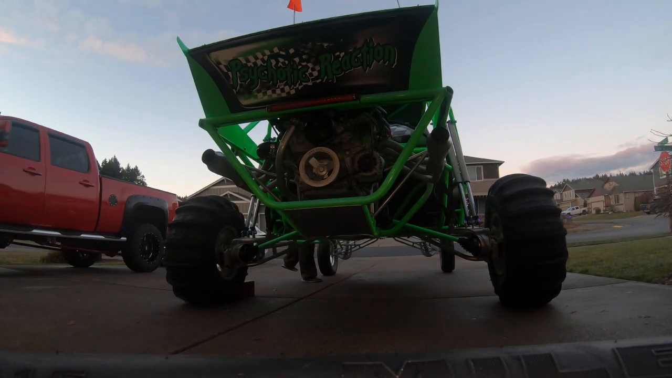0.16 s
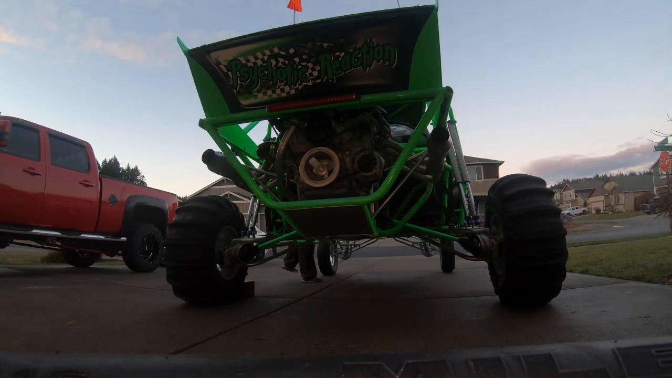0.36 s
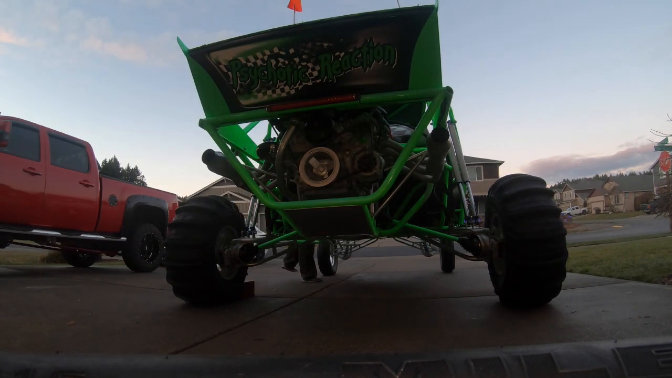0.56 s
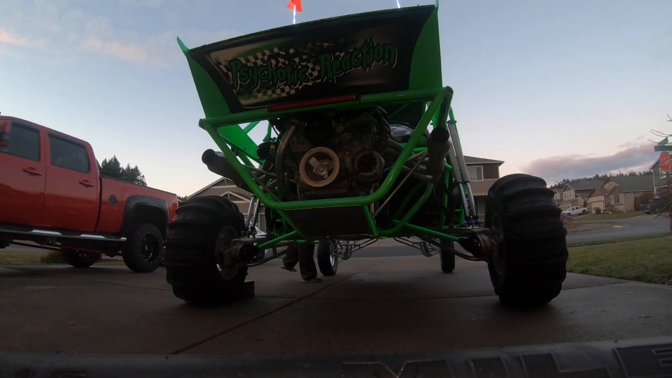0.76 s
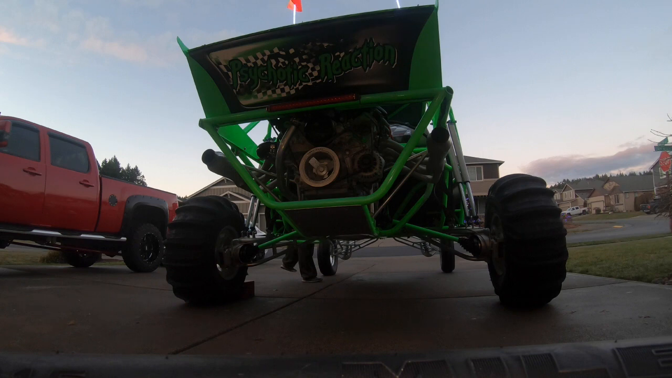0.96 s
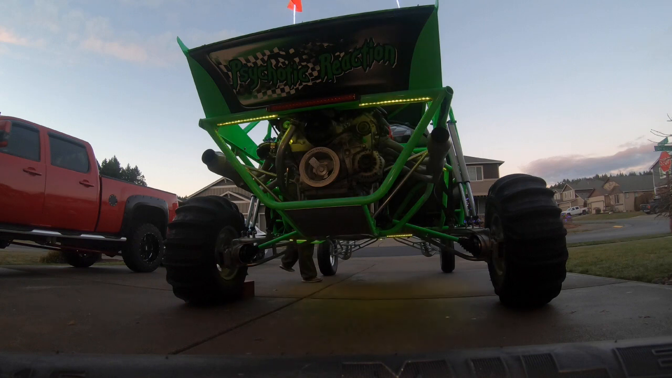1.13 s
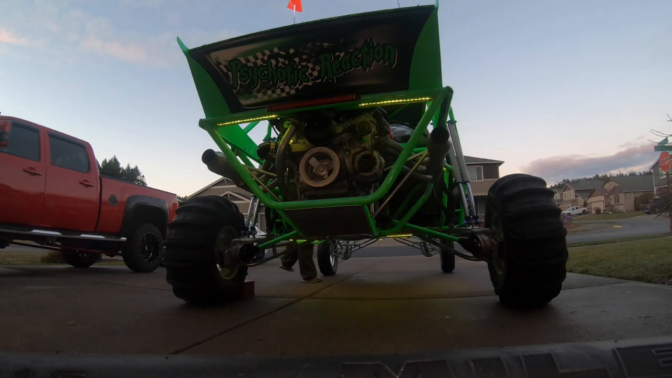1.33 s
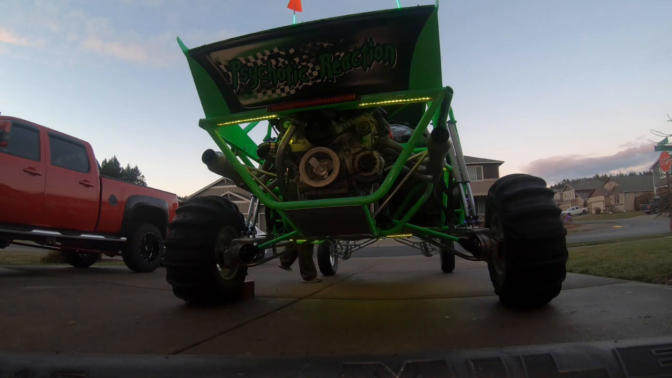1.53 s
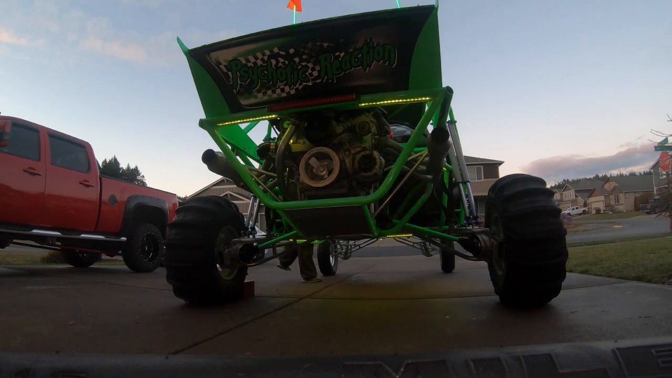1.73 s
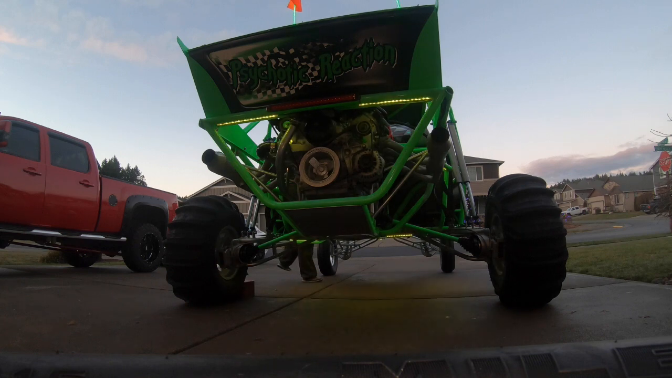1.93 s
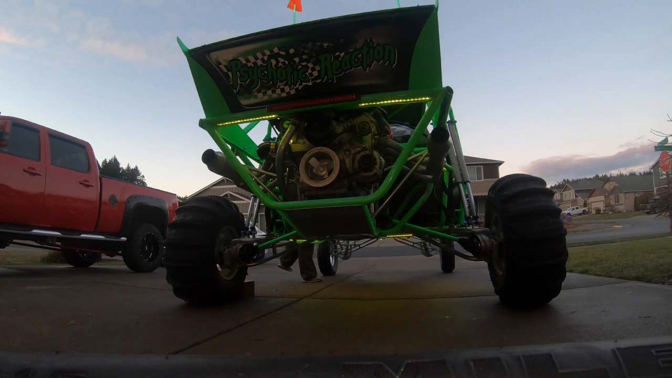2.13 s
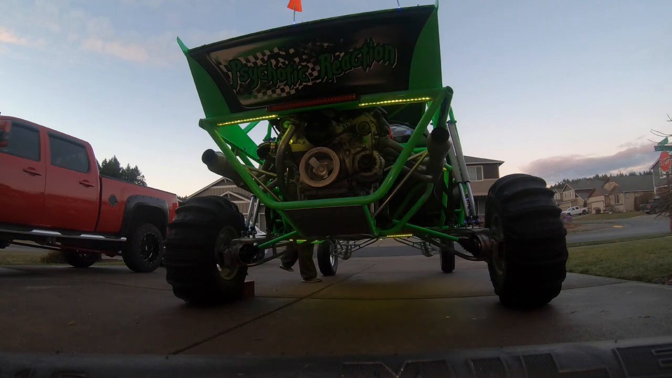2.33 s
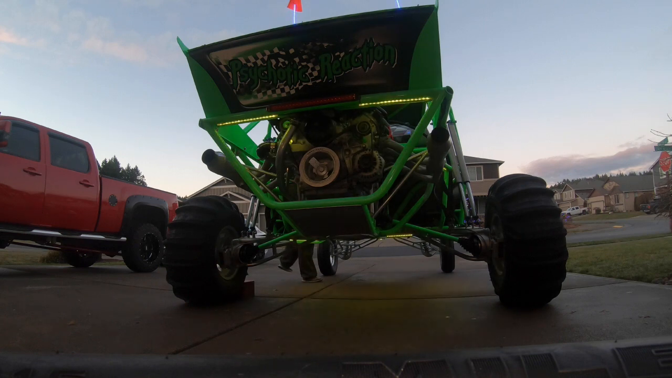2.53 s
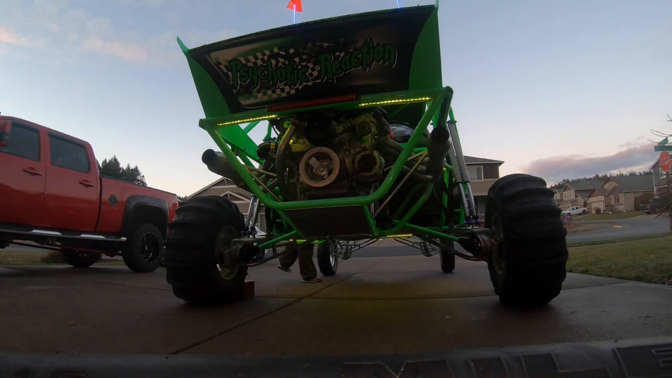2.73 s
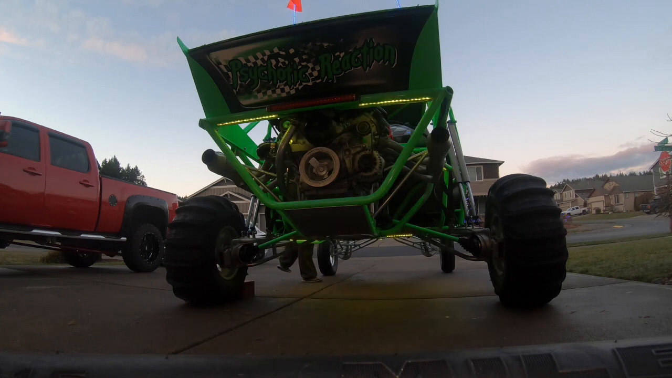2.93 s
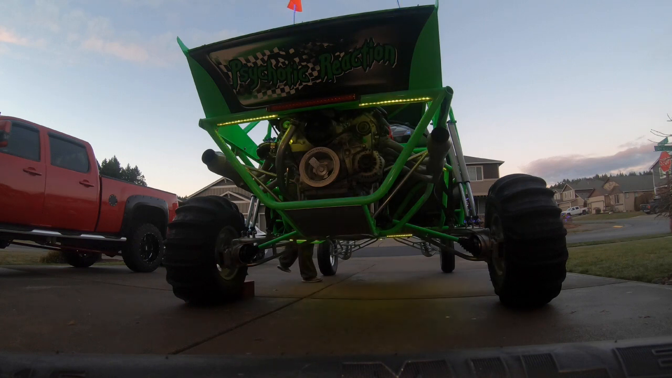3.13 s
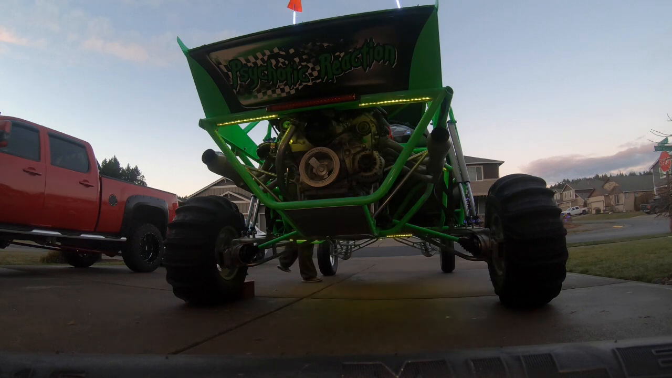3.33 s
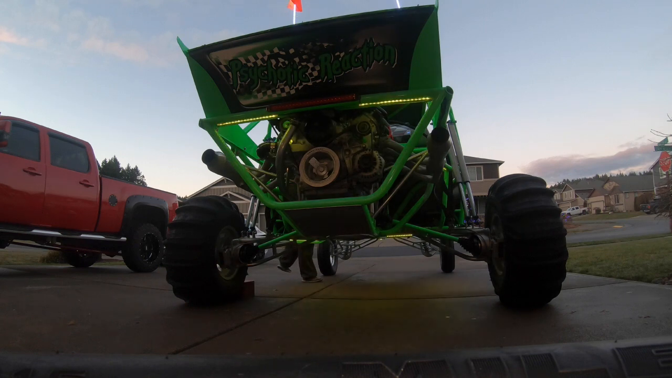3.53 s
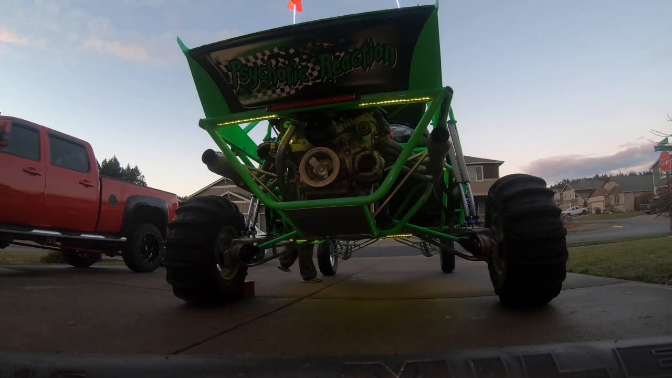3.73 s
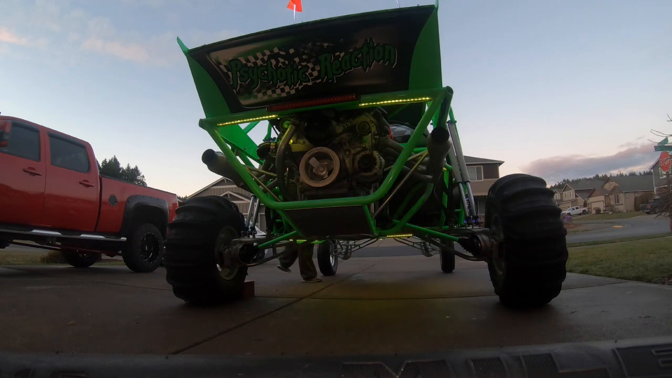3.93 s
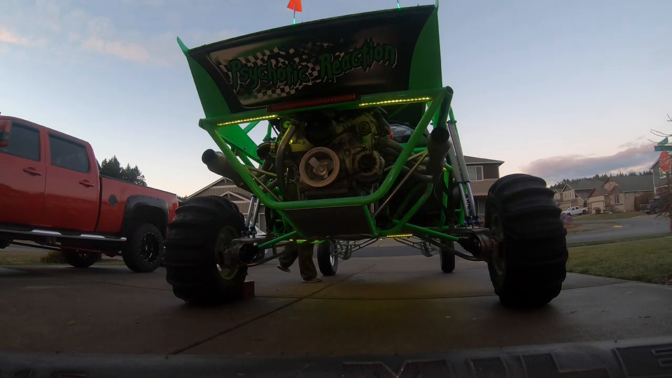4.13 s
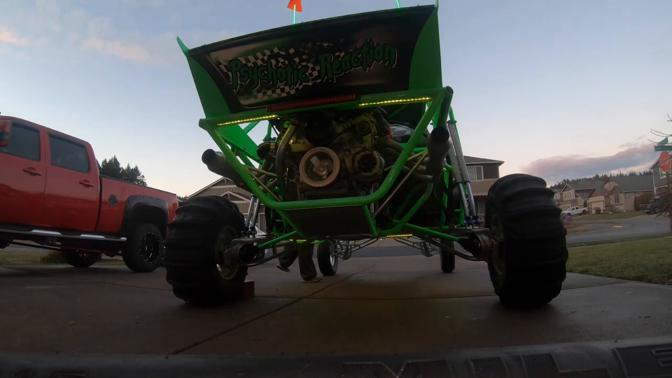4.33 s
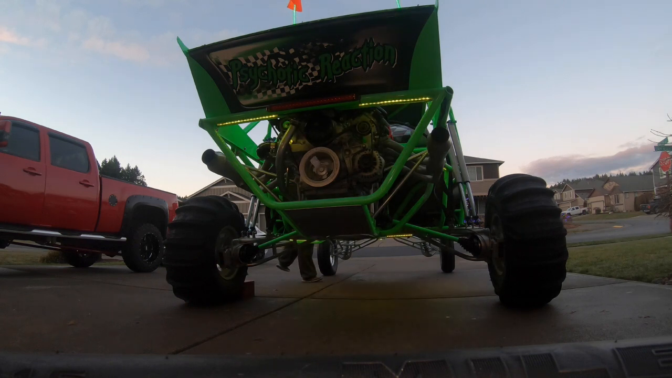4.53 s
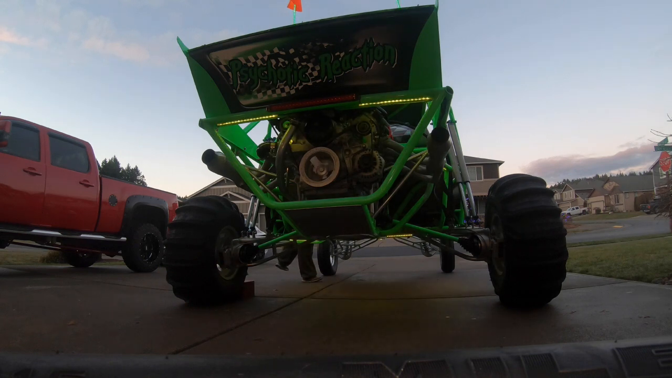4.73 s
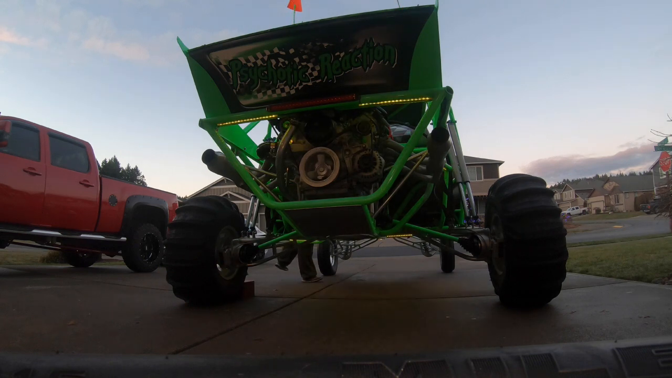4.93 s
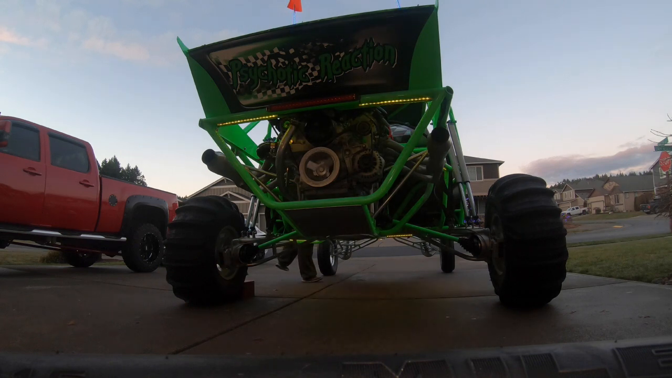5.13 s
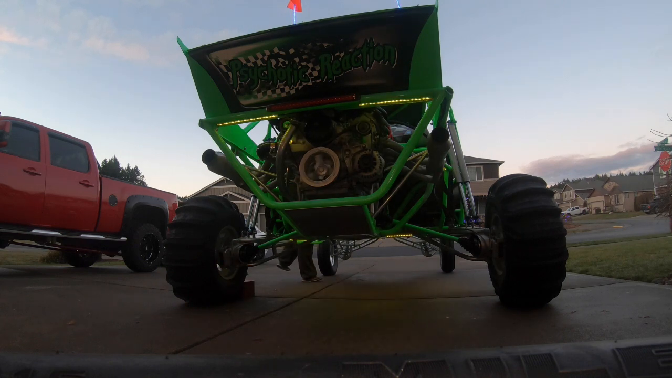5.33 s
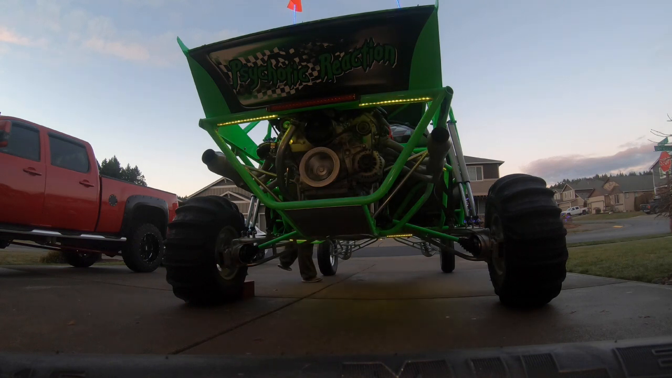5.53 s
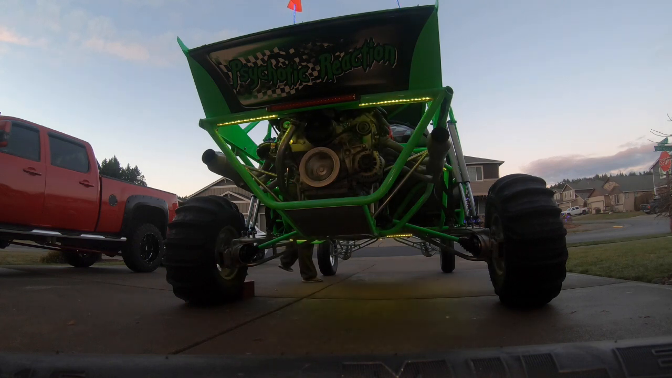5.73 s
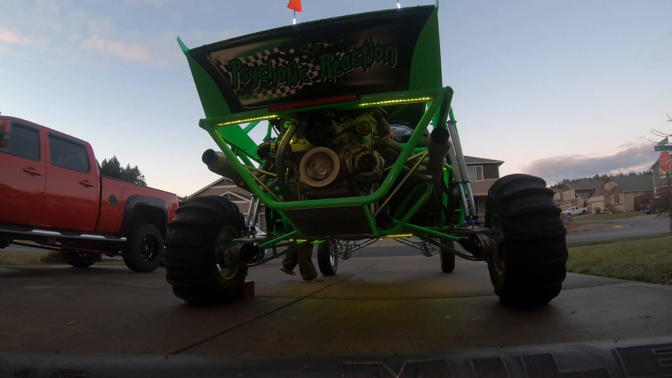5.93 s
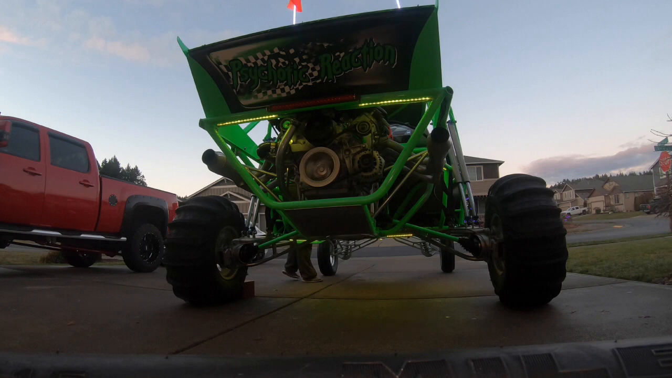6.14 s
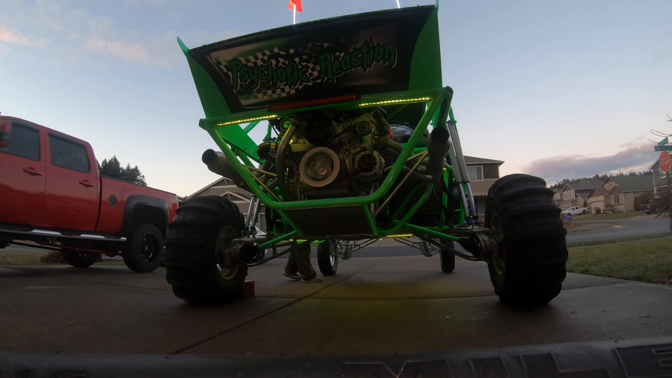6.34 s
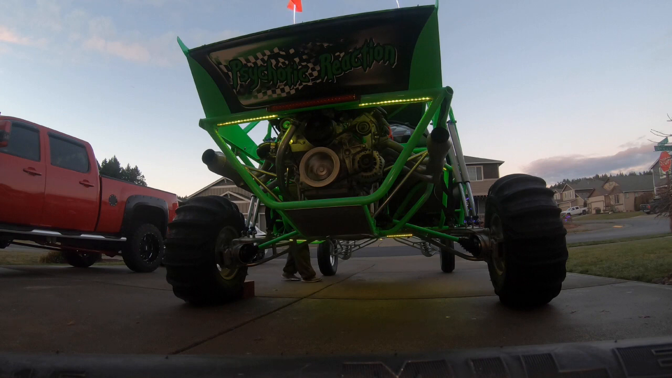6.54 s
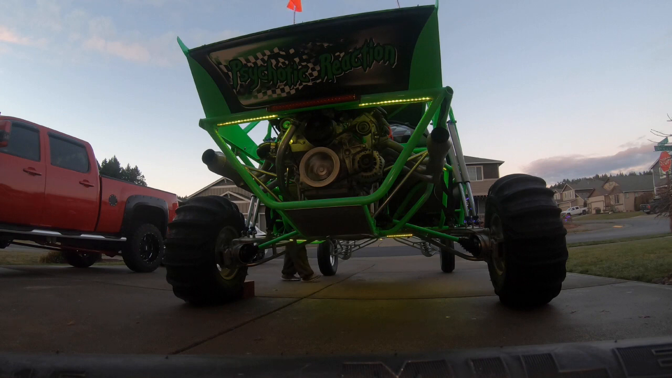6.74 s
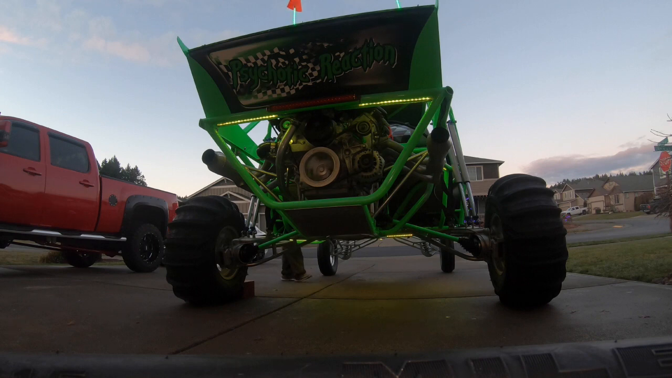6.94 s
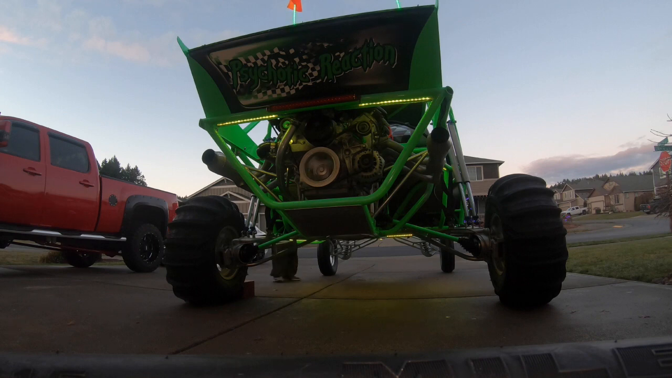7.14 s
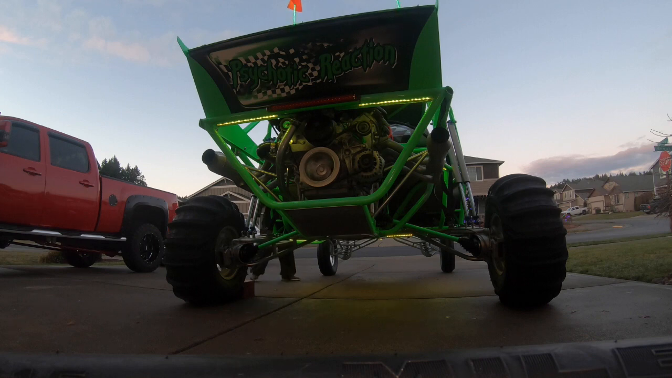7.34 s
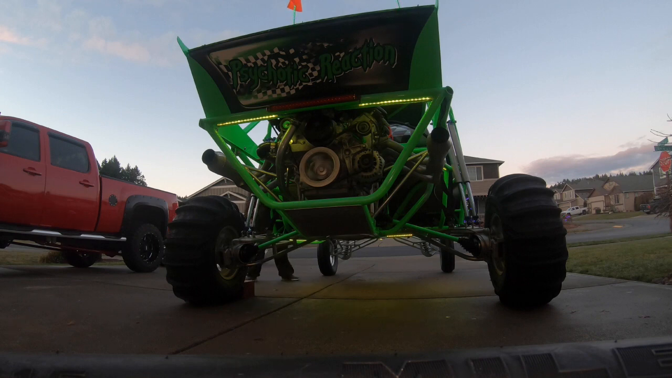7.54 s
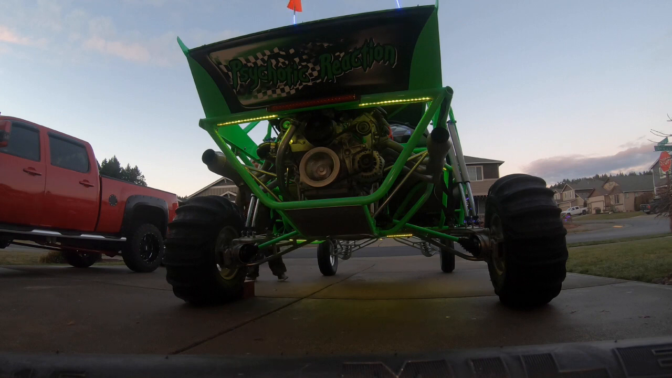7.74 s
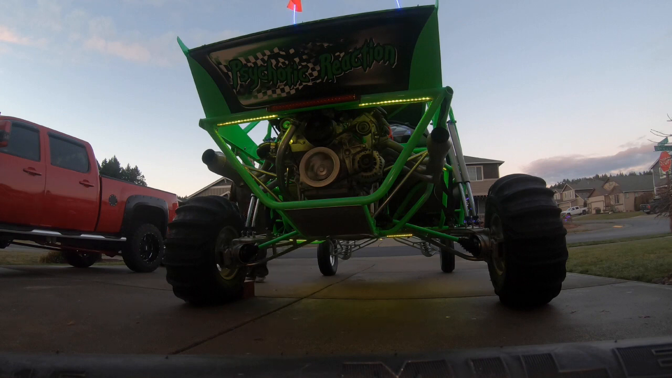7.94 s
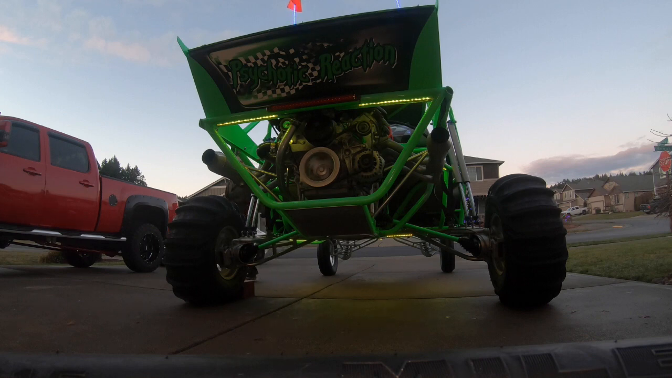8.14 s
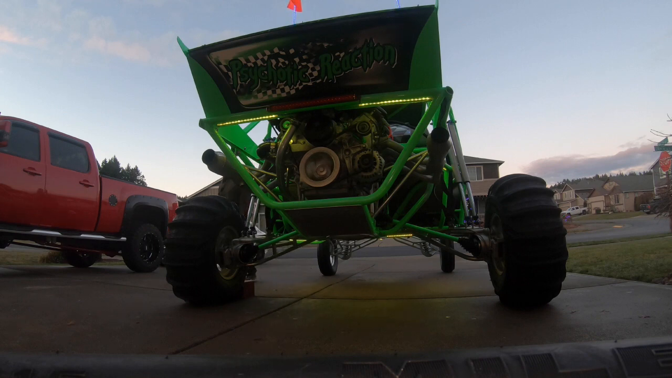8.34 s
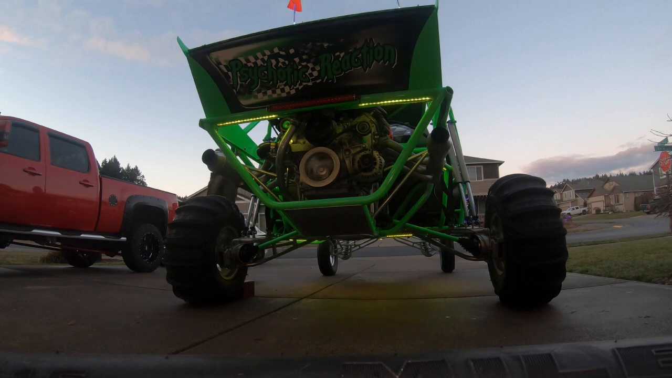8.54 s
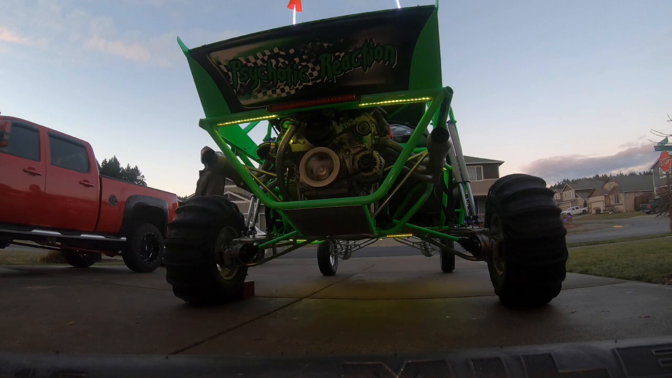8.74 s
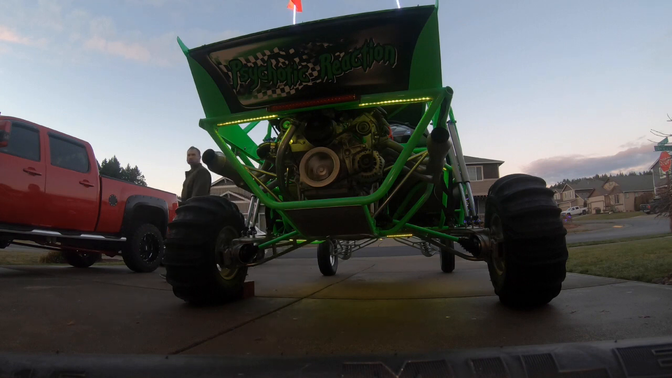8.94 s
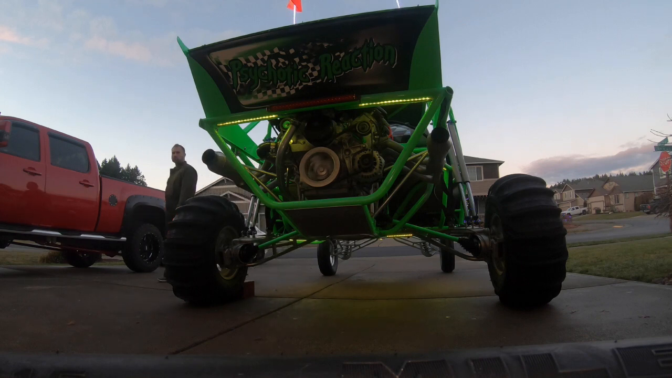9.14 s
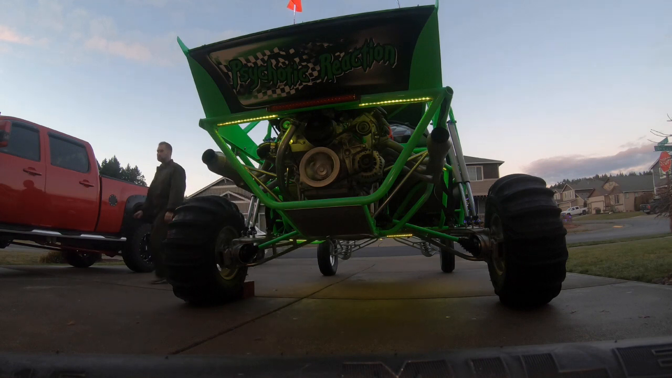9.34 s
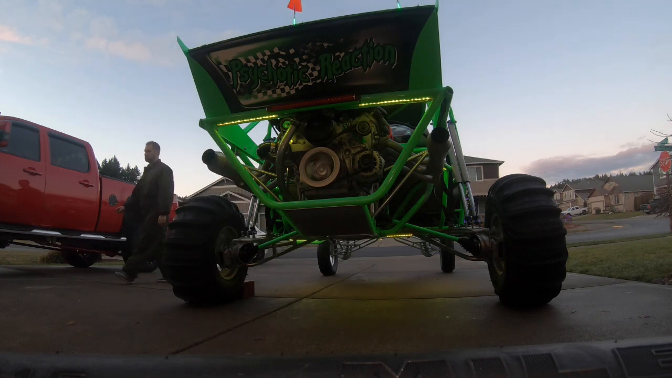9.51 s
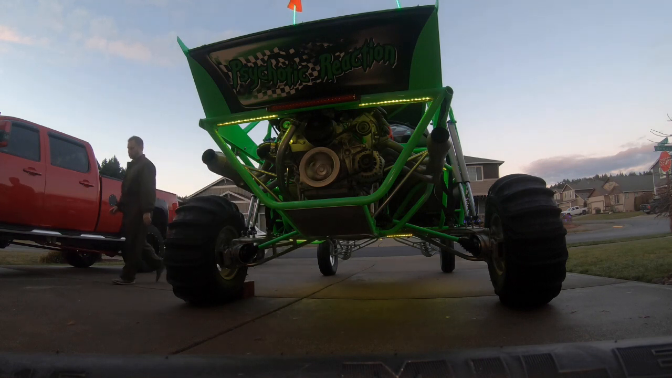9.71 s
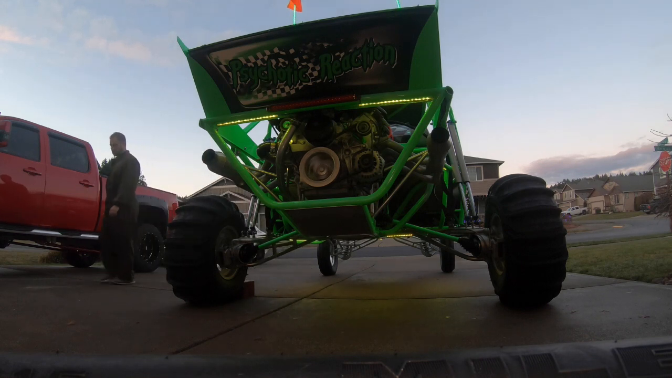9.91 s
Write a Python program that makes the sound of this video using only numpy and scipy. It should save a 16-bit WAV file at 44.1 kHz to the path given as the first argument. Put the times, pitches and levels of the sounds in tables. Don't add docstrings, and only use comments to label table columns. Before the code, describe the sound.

A fuel pump whirrs, metal lever clunks, a starter grinds slowly, then an open-piped V8 catches, flares and settles into a booming driveway idle.

```python
import sys
import numpy as np
from scipy import signal
from scipy.fft import rfft, irfft
from scipy.io import wavfile
from scipy.ndimage import uniform_filter1d

SR = 44100
rng = np.random.default_rng(int(sys.argv[2]) if len(sys.argv) > 2 else 0)


def wav_record(signal):
    frames = np.transpose(np.atleast_2d(signal))
    bounded = np.clip(frames, -1, 1)
    quanta = np.round(bounded * 32767).astype(np.int16)
    wavfile.write(sys.argv[1], SR, quanta)


def to_linear_factor(level_db):
    exponent = np.asarray(level_db, float) / 20
    return 10 ** exponent


N = 439677
T = np.arange(N) / SR
HZ = np.fft.rfftfreq(N, 1 / SR)


def across(table):
    hz, value = np.transpose(table)
    return np.interp(np.log(HZ + 1), np.log(hz), value)


def along(table):
    s, *columns = np.transpose(table)
    return [np.interp(T, s, c) for c in columns]


def unit(x, span=(0, 10)):
    return x / np.std(x[int(span[0] * SR):int(span[1] * SR)])


def hiss():
    return rng.standard_normal(N)


def noise(spectrum):
    return unit(irfft(rfft(hiss()) * to_linear_factor(across(spectrum)), N))


def ring(x, hz, width_hz):
    return signal.lfilter(*signal.iirpeak(hz, hz / width_hz, fs=SR), x)


def fade(x, t60):
    return signal.lfilter([1], [1, -np.exp(-np.log(1000) / (t60 * SR))], x)


def walk(rate):
    k = int(SR / rate)
    steps = np.repeat(rng.standard_normal(N // k + 1), k)
    return unit(uniform_filter1d(uniform_filter1d(steps, k), k)[:N])


def strokes(turns, size):
    stroke = turns.astype(int)
    return np.diff(stroke, prepend=stroke[0]) * size[stroke]


def gate(t0, t1, edge=0.0056):
    return np.clip(np.minimum(T - t0, t1 - T) / edge, 0, 1)


def bursts(table, rise, t60):
    out = np.zeros(N)
    for s, db in table:
        age = np.maximum(T - s, 0)
        out += np.minimum(age / rise, 1) * to_linear_factor(db - 60 * age / t60)
    return out


# (frequency [Hz], level [dB per Hz])
RUMBLE = [(12, -66), (20, -25), (124, 0.5), (175, -11), (290, -14), (347, -21.5), (566, -22.5), (702, -20),
          (826, -22.5), (1500, -28.5), (1950, -63), (3300, -120)]
# (frequency [Hz], level [dB per Hz])
HISS = [(880, -66), (1500, -24.5), (1920, -29), (2590, -21.5), (3480, -21.5), (4850, -19.5), (5300, -17.5),
        (5680, -20), (8080, -3.5), (8650, -5), (10700, -29), (15600, -39.5)]
# (frequency [Hz], likeness [0-1])
AIR_ALIKE = [(60, 1), (200, 0.58), (400, 0), (3000, 0.43), (8000, 0)]


def air():
    alike = np.clip(across(AIR_ALIKE), 0, 1)
    swell_db = 1.4
    both = []
    for _ in range(2):
        rumble = to_linear_factor(-56 + swell_db * walk(5.91)) * noise(RUMBLE)
        both.append(rumble + to_linear_factor(-46.5) * noise(HISS))
    mid = irfft(rfft(both[0]) * np.sqrt(1 + alike), N)
    side = irfft(rfft(both[1]) * np.sqrt(1 - alike), N)
    return to_linear_factor(-1.5) * np.array([(mid + side) * to_linear_factor(-0.45), (mid - side) * to_linear_factor(1.15)])


# (frequency [Hz], level [dB])
PUMP_LINES = [(317.6, -63), (339.1, -68), (409.1, -70), (1707, -70.5), (2051, -71.5), (2562, -69),
              (2902, -72), (3074, -69), (4274, -65.5)]
# (frequency [Hz], level [dB per Hz])
PUMP_WHIRR = [(200, -5), (330, 4.5), (450, -7.5), (900, -16), (1700, -6), (2800, -6), (4300, -4),
              (6000, -27)]


def pump():
    on_s, off_s, sag_db_per_s = 0.74, 3.82, 1.5
    lines = np.zeros(N)
    for hz, db in PUMP_LINES:
        lines += to_linear_factor(db + 1.5 * walk(12)) * np.sin(2 * np.pi * (hz * T + .025 * walk(8)))
    level = to_linear_factor(-54.5 - sag_db_per_s * (T - on_s)) * gate(on_s, off_s, edge=0.075)
    level += bursts([(0.72, -43)], 0.022, 0.23)
    whirr = to_linear_factor(-1) * noise(PUMP_WHIRR) * to_linear_factor(1.2 * walk(30))
    return level * (np.interp(T, [.8, 2.0], [.25, 1]) * unit(lines) + whirr)


# (time [s], rattle level [dB], thud level [dB], ring level [dB], clank level [dB])
CLUNKS = [(0.628, -52, -70, -72, -43.5), (0.743, -56, -60, -56, -56), (0.819, -60, -44.5, -60, -44),
          (1.048, -25, -40.5, -33.5, -33.5), (1.245, -29.5, -33, -28, -36.5),
          (1.349, -26.5, -32, -35, -24.5), (1.509, -27.5, -31, -30.5, -34),
          (1.623, -29, -29.5, -30.5, -28.5), (1.811, -47, -37, -44, -60), (1.93, -35, -41, -33, -48),
          (3.768, -45.5, -47, -55, -55)]
# (frequency [Hz], time to fall 60 dB [s], level [dB])
LEVER = [
    (525, 0.28, -2.5),
    (451, 0.16, -14),
    (656, 0.17, -11.5),
]


def clunks():
    thud = unit(ring(ring(hiss(), 115, 113), 175, 250))
    rattle = noise([(300, -6.5), (600, -4), (1300, -3.0), (2000, -6), (2800, -10), (5000, -52)])
    clank = noise([(1800, -12), (2500, -2.5), (3150, 6), (3800, -3.5), (5500, -7.5), (9000, -24)])
    grain = to_linear_factor(2.3 * walk(150))
    rebound_s, rebound_db = 0.046, (-6.5, -11, -7.5, -15)
    rebounds = [(s + rebound_s, *np.add((c, th, r, c), rebound_db)) for s, _, th, r, c in CLUNKS]
    out = np.zeros(N)
    for s, rattle_db, thud_db, ring_db, clank_db in CLUNKS + rebounds:
        at = slice(int(s * SR), int((s + .5) * SR))
        age = T[at] - T[at][0]
        blow = np.minimum(age / .003, 1) * to_linear_factor(-60 * age / 0.31)
        out[at] += blow * to_linear_factor(rattle_db - 8.5) * rattle[at] * grain[at]
        out[at] += blow * to_linear_factor(clank_db - 7.0 - 210 * age) * clank[at]
        ping_hz = (3170 if s > 1 else 3950) * (1 + 0.015 * rng.standard_normal())
        out[at] += to_linear_factor(clank_db - 1.5 - 60 * age / 0.05) * np.sin(2 * np.pi * age * ping_hz)
        for hz, t60, db in LEVER:
            tone_hz = hz * (1 + 0.027 * rng.standard_normal())
            out[at] += to_linear_factor(ring_db + db - 60 * age / t60) * np.sin(2 * np.pi * tone_hz * age)
        slow = np.minimum(age / 0.02, 1) * to_linear_factor(-60 * age / 0.45)
        out[at] += to_linear_factor(thud_db - 2.5) * slow * thud[at]
    return out


# (time [s], peak level [dB], ring frequency [Hz], time to fall 60 dB [s])
PINION = [
    (4.388, -18, 1240, 0.15),
    (4.388, -14.5, 2260, .06),
    (5.4, -8, 2100, 0.045),
    (5.358, -21, 1500, 0.34),
    (5.357, -22, 1760, 0.094),
]


def pinion():
    out = np.zeros(N)
    for s, db, hz, t60 in PINION:
        age = np.maximum(T - s, 0)
        out += to_linear_factor(db - 60 * age / t60) * np.sin(2 * np.pi * hz * age)
    return out


# (time [s], gear tooth rate [Hz], level [dB])
STARTER = [(4.378, 678, -24.5), (4.498, 999.5, -20.5), (4.578, 1010, -24), (4.646, 676.5, -20),
           (4.778, 979.5, -21), (4.92, 999, -25), (5.03, 851, -26), (5.23, 916.4, -23), (5.37, 1105, -28.5)]
# (frequency [Hz], width [Hz], level [dB])
HOUSING = [(274, 18, -15.5), (643.6, 24, 1.5), (823, 44, -2.5), (898, 44, 0.5), (1050, 24, -13),
           (1290, 62, 2.5), (1360, 17, -7), (1725, 84, 0), (1797, 72, -0.5), (2056, 55, 1), (2430, 24, -6),
           (2636, 36, -7.5), (2837, 50, -6.5), (3160, 80, -4), (3720, 52, -6), (3870, 120, -2.5),
           (5570, 90, -17)]
# (frequency [Hz], level [dB per Hz])
GRIND = [(94, -49), (160, -13), (268, -11.5), (545, -17.5), (648, -8), (1150, -2), (1320, -3.5),
         (3360, -13.5), (3770, -9), (8430, -31), (15600, -75)]
# (time [s], peak level [dB])
LASH = [
    (4.38, -7),
    (4.5051, -21),
    (4.5585, -9.5),
    (4.7326, -15),
    (4.8713, -18),
    (5.006, -11.5),
    (5.1, -12),
    (5.1909, -19),
]


def starter():
    tooth_hz, housing_db = along(STARTER)
    for s, _ in LASH[1:]:
        housing_db = housing_db - 4 * gate(s - .03, s, edge=.012)
    teeth = np.cumsum(tooth_hz * (1 + .03 * walk(60))) / SR
    count = int(teeth[-1]) + 2
    bite = np.resize([2.2, .5, .3], count)
    blows = strokes(teeth, rng.standard_normal(count) * 2.04 + bite)
    chatter = to_linear_factor(1.5 * walk(70))
    low, high = np.zeros(N), np.zeros(N)
    for hz, width, db in HOUSING:
        mode = to_linear_factor(db + 2.8 * walk(22)) * unit(ring(ring(blows, hz, width), hz, 6 * width))
        if hz > 2200:
            high += mode
        else:
            low += mode
    whine = np.zeros(N)
    for k, db in enumerate([-3, -15, -19, -19], 1):
        whine += to_linear_factor(db) * walk(35) * np.sin(2 * np.pi * k * teeth)
    whine *= np.interp(T, [4.66, 4.85], [1.3, .5])
    lash = bursts(LASH, .018, 0.14)
    grind = unit(low) * chatter + whine + to_linear_factor(-1) * noise(GRIND) * chatter
    grind *= to_linear_factor(housing_db - 2) * (1 + to_linear_factor(3) * lash)
    rasp = noise([(1500, -15), (2600, 7.0), (4000, 1), (6000, -1.0), (9000, -10), (11000, -29), (15000, -42)])
    rasp = (to_linear_factor(housing_db - 7) + to_linear_factor(-11.5) * lash) * chatter * (rasp + to_linear_factor(-0.5) * unit(high))
    breath = to_linear_factor(-34.5) + to_linear_factor(-15.5) * bursts(LASH, 0.037, 0.37)
    breath = breath * unit(ring(ring(hiss(), 75, 36), 70, 54))
    return (grind + rasp + breath) * gate(4.378, 5.37, edge=0.018) + pinion()


def boom(firings, rough, bank):
    count = len(bank)
    swing_db = rough * np.interp(firings, np.arange(count), 0.66 * rng.standard_normal(count))
    late = rough * np.interp(firings, np.arange(count), 0.018 * rng.standard_normal(count))
    lump_db = 0.9 * np.cos(np.pi / 4 * (firings - 7.2))
    swing = np.sqrt(2) * to_linear_factor(swing_db + lump_db) * np.cos(2 * np.pi * (firings + late))
    pushes = strokes(firings + 0.087, bank + .5 * rng.standard_normal(count))
    lope = unit(ring(ring(pushes, 109.6, 45), 105, 130)) * rough
    return swing + to_linear_factor(-15.0) * lope


# (frequency [Hz], width [Hz], level [dB])
PIPES = [(190, 45, -4.5), (272, 22, -5.5), (303, 20, -2), (335, 30, -12), (295, 55, -4), (485, 26, -10.5),
         (650, 22, -9.5)]


def pipe_knocks(firings, knock_db):
    count = len(knock_db)
    settle = np.interp(np.arange(count), np.interp([6.2, 6.7], T, firings), [.25, 1])
    size = settle * to_linear_factor(knock_db + rng.standard_normal(count)) + .19 * rng.standard_normal(count)
    knocks = strokes(firings - .47, size)
    pipes = np.zeros(N)
    for hz, width, db in PIPES:
        pipes += to_linear_factor(db) * unit(ring(ring(knocks, hz, width), hz, 2 * width))
    roar = unit(ring(ring(hiss(), 260, 260), 260, 400))
    return unit(pipes) + to_linear_factor(np.interp(T, [5.75, 6.0], [0, -9])) * roar


# (frequency [Hz], level [dB per Hz])
GAS = [(220, 2), (380, -5.5), (588, -2), (645, -0.5), (853, -6.5), (1270, -4), (1910, -12.5), (3500, -18),
       (4550, -18), (7700, -120)]


def exhaust_gas(firings, puff_db):
    puffs = fade(strokes(firings - .2, to_linear_factor(puff_db + 2.0 * rng.standard_normal(len(puff_db)))), 0.019)
    return noise(GAS) * (1.55 + puffs) * to_linear_factor(1.06 * walk(9))


# (frequency [Hz], level [dB per Hz])
VALVES = [(1290, -5.5), (2200, -2.5), (4170, -6.5), (4670, -3), (5070, -6.5), (6270, -9), (8770, -8),
          (11600, -25.5), (14500, -33), (15600, -36)]
# (frequency [Hz], level [dB per Hz])
TICK = [(3500, -31), (5500, 1.5), (7500, 0.5), (9000, 0), (10500, -13.5), (13000, -17.5), (15500, -28)]


def valve_ticks(firings, tick_db):
    ticks = fade(strokes(firings - .14, to_linear_factor(tick_db + 3.8 * rng.standard_normal(len(tick_db)))), .016)
    ticks = uniform_filter1d(ticks, size=50)
    return noise(VALVES) * to_linear_factor(walk(14)) + to_linear_factor(7) * noise(TICK) * ticks


# (time [s], peak level [dB])
SPITS = [(5.3463, -20.5), (5.361, -9), (5.404, -7.5), (5.473, -4), (5.499, -9.5), (5.55, -6.5), (5.591, -4),
         (5.606, -9), (5.657, -8), (5.6811, -21), (5.7125, -12), (5.732, -24), (5.7614, -16), (5.7903, -21),
         (5.809, -16.5), (5.875, -17), (5.8996, -30), (5.947, -21)]


def spits():
    colour = [(200, -22), (500, -4.0), (1500, 0.0), (4000, -3), (8500, -2.5), (10500, -17.5), (15500, -27)]
    return to_linear_factor(-6.5) * bursts(SPITS, 0.0016, 0.049) * noise(colour)


# (bank [+1 near, -1 far], pipe knock level [dB], gas level [dB], valve tick level [dB])
CYLINDERS = [(1, -20, 0, -4), (-1, -24, 0, -3), (1, -24, -1, 1), (-1, -24, -1, -3), (-1, -24, 1, -7),
             (1, 0, 3, -2), (-1, -14, 1, -7), (1, -24, 0, -8)]
# (time [s], firing rate [firings per s])
SPEED = [(5.36, 63.69), (5.545, 83.9), (5.61, 66.06), (5.705, 95.34), (5.915, 125.35), (6.015, 107.43),
         (6.115, 86.55), (6.275, 83.36), (6.33, 75.72), (6.675, 79.11), (7.065, 87.48), (7.435, 84.38),
         (7.85, 82.29), (8.22, 85.89), (8.775, 79.22), (9.06, 81.22), (9.465, 81.66), (9.97, 76.26)]
# (time [s], boom level [dB], throttle [0-1], unevenness of the burns [ratio])
LOAD = [(5.305, -34, 0.03, 1.1), (5.327, -16, .05, 1), (5.35, -29, .05, 1.1), (5.385, -10.5, 0.1, 1),
        (5.405, -23, 0.2, 1.2), (5.425, -9, 0.2, 1.1), (5.45, -18, 0.2, 1.1), (5.51, -11, 0.17, 1.1),
        (5.56, -13, 0.65, 1.6), (5.62, -12, 0.9, 1.5), (5.665, -8.5, 1, 1.34), (5.75, -11.5, 0.64, 0.81),
        (5.97, -16.5, 0.36, 2.6), (6.04, -12.5, 0.13, 1.54), (6.34, -13.5, 0.12, 1.34),
        (6.6, -12, 0.04, 1.04)]


def engine():
    boom_db, throttle, rough = along(LOAD)
    speed = along(SPEED)[0]
    firings = np.cumsum(speed) / SR + 7.602
    count = int(firings[-1]) + 3
    bank, knock_db, puff_db, tick_db = np.resize(np.array(CYLINDERS, float), (count, 4)).T

    idle_hz, knock_hz, shut_db = 83, 81, -3.5
    shut = np.clip(1 - (T - 6.39) / 0.57, 0, 1)
    sag_hz = np.minimum(speed - knock_hz, 0) * (1 - shut)
    pipe_db = -28 + 12.5 * throttle + 1.85 * sag_hz + 1.47 * shut_db * shut
    gas_db = -33.5 + 16.5 * throttle + 0.02 * (speed - idle_hz) * (1 - shut) + shut_db * shut
    oiled = np.maximum(T - 5.72, 0)
    valve_db = -42 + 12.5 * np.exp(-oiled / 0.2) + 4.5 * np.exp(-oiled / 1.5)

    idle = 6.5, 9.9
    layers = to_linear_factor(pipe_db) * unit(pipe_knocks(firings, knock_db), idle)
    layers += to_linear_factor(gas_db) * unit(exhaust_gas(firings, puff_db), idle)
    layers += to_linear_factor(valve_db) * unit(valve_ticks(firings, tick_db), idle)
    thump = to_linear_factor(boom_db) * boom(firings, rough, bank) * gate(5.3, 11)
    return thump + layers * gate(5.345, 11, edge=0.025) + spits()


# (frequency [Hz], side minus mid level [dB])
YARD_SIDE = [(60, -18), (110, -18), (200, -20), (380, -17), (700, -7), (1290, -6), (2380, -7), (4400, -7),
             (8120, -1), (15000, 0)]
# (frequency [Hz], left minus right level [dB])
YARD_BALANCE = [(60, -0.5), (110, -0.5), (200, -1.0), (380, -1.5), (700, -3.5), (1290, -0.5), (2380, -0.5),
                (4400, 0.0), (8120, 0.0), (15000, -1.5)]


def yard(x):
    age = T[:int(.25 * SR)]
    tails = rng.standard_normal((2, len(age))) * to_linear_factor(-60 * age / 0.17)
    wet, apart = rfft(tails / np.linalg.norm(tails, axis=1, keepdims=True), N)
    treble = HZ ** 2 / (HZ ** 2 + 700 ** 2)
    mid = rfft(x) * (1 + to_linear_factor(-9) * treble * wet)
    shifting = rfft(x * walk(40)) * apart * to_linear_factor(across(YARD_SIDE))
    side = shifting + mid * np.tanh(across(YARD_BALANCE) * np.log(10) / 40)
    return irfft(np.array([mid + side, mid - side]), N)


def scene():
    duck_db = np.interp(T, [4.38, 4.45, 5.3, 5.5], [0.5, 3, 8.5, -37])
    background = air() * to_linear_factor(duck_db)
    running = yard(engine() + starter()) * gate(4.36, 11)
    return background + yard(pump() + clunks()) + running


def low_pass(x):
    return signal.sosfilt(signal.butter(12, 15710, fs=SR, output="sos"), x)


def record(dry):
    top = signal.ellip(8, .2, 60, 15600, fs=SR, output="sos")
    rounded = np.tanh(0.59 * dry) / 0.62
    return low_pass(signal.sosfilt(top, rounded))


dry = scene()
out = record(dry)
wav_record(out)
```